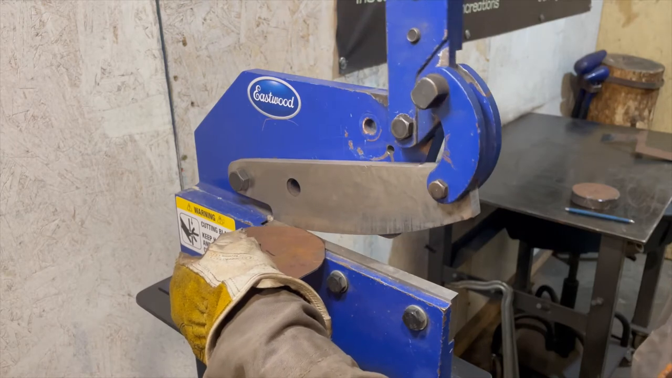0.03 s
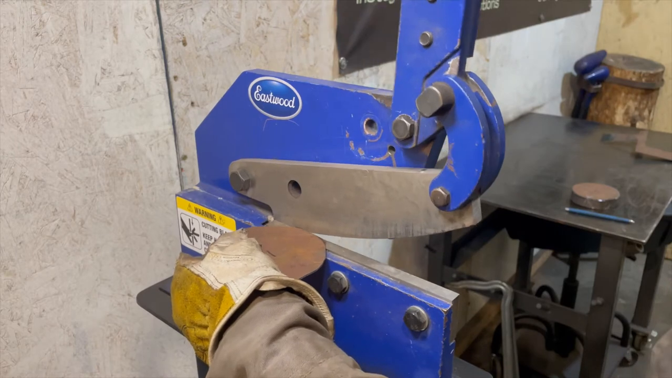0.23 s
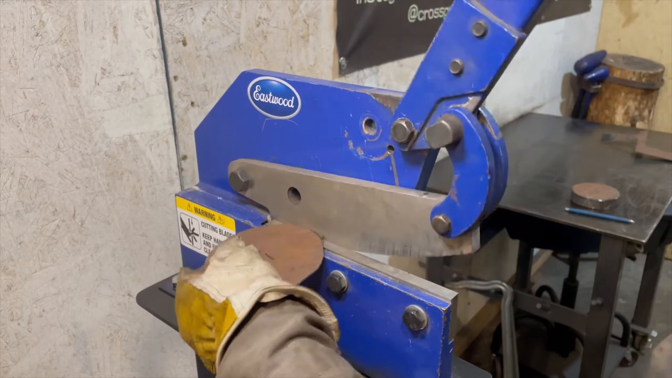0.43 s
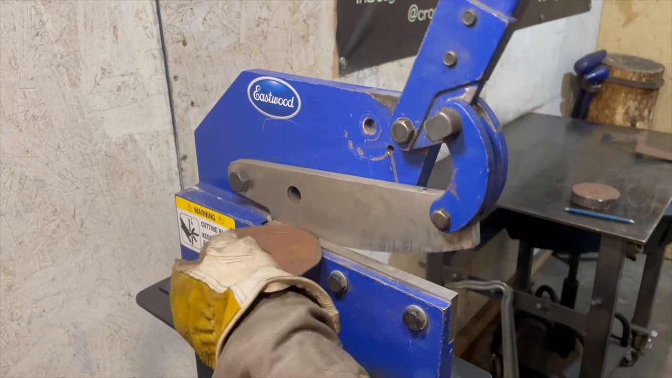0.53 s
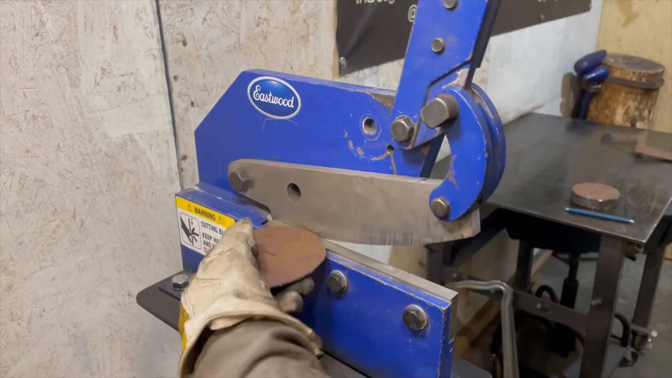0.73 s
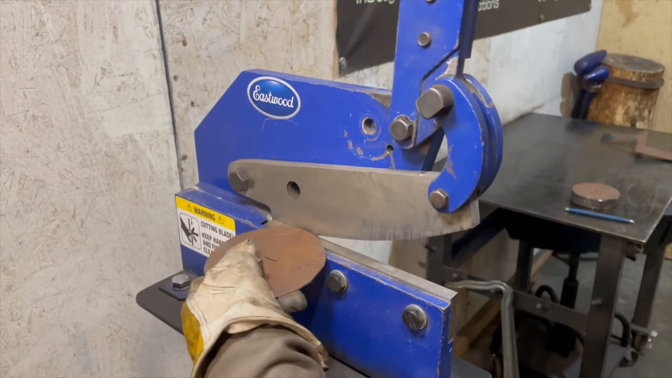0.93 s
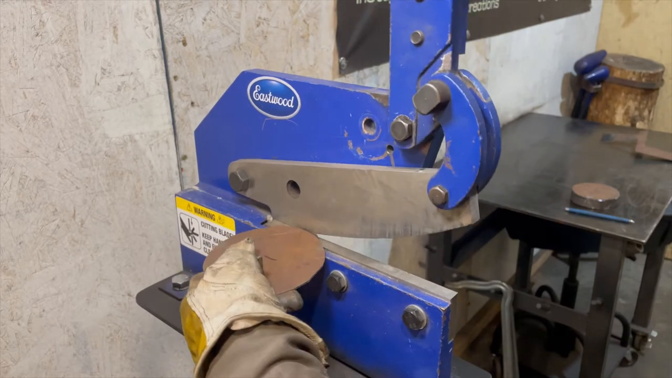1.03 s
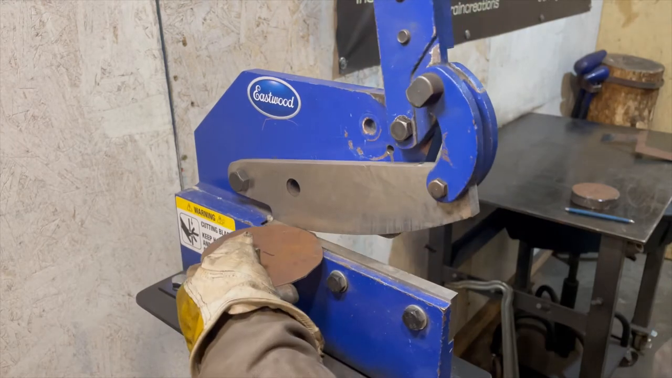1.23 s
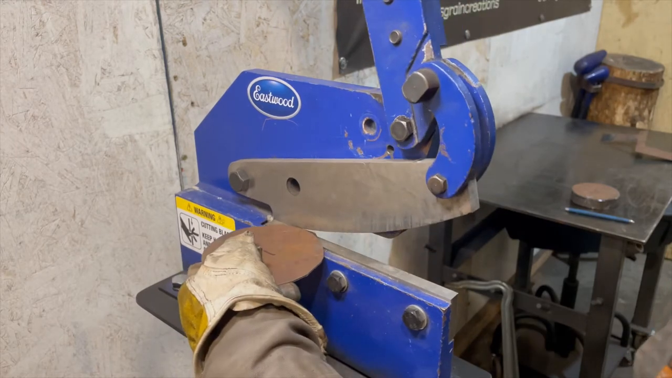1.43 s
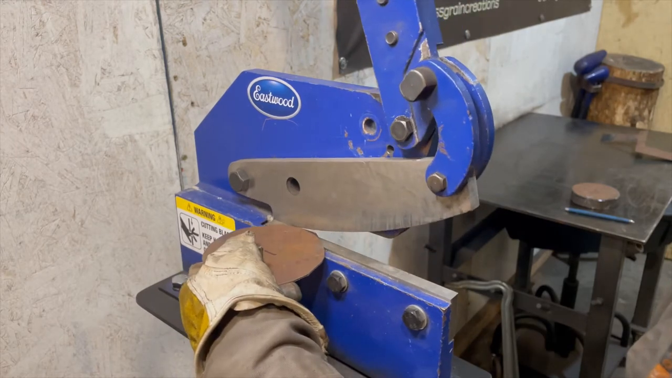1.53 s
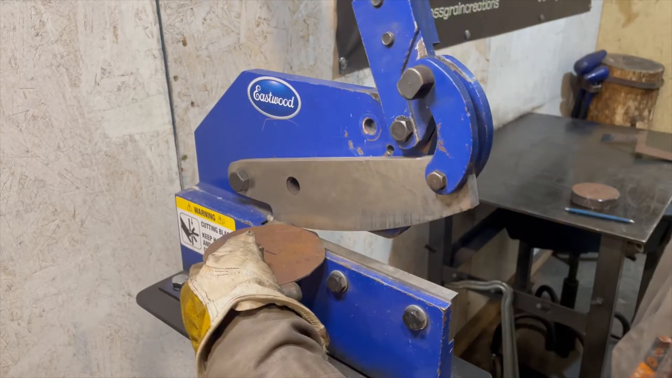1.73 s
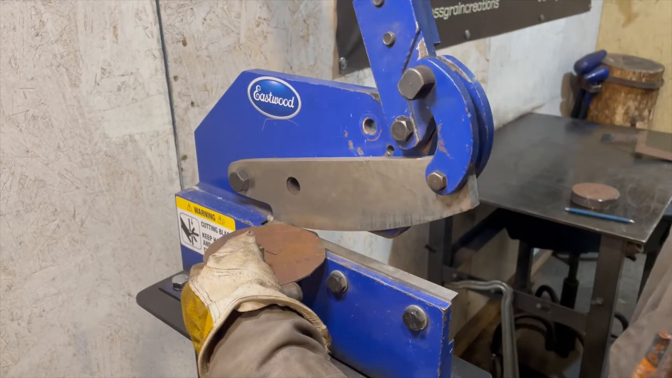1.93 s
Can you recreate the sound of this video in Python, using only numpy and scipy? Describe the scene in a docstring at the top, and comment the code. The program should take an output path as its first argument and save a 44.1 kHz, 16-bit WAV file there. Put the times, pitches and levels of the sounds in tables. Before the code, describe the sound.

A bench lever shear cuts a steel disc. A previous blow's faint ring and low bench hum fade first; a short bite at 0.2 s bursts into a loud, bright crack and clanging frame ring around 0.23-0.3 s. The offcut clinks and handle knocks at 0.52-0.6, 0.72 and 0.88 s. Ringing decays in the workshop, leaving quiet air, faint glove rustle from 1 s and tiny ticks after 1.27 s.

```python
"""A bench lever shear bites a steel disc and snaps through it, as fading sine rings and bursts of noise.
Frame and lever ring on, the offcut clinks as it drops and bounces, and the handle knocks its stop.
The bench hums and shakes in low wavering sines; a glove rustles and faint ticks follow.
An earlier blow is still dying at the start, over steady workshop air; the room answers the blows."""
import sys
import numpy as np
from scipy import signal
from scipy.fft import rfft, irfft, next_fast_len
from scipy.io import wavfile

SR = 44100
rng = np.random.default_rng(int(sys.argv[2]) if len(sys.argv) > 2 else 0)


def pcm_store(signal):
    """Save signal as 16-bit PCM."""
    levels = np.round(np.clip(np.atleast_2d(signal), -1, 1) * 32767)
    wavfile.write(sys.argv[1], SR, levels.astype(np.int16).T)


N = 88200
T = np.arange(N) / SR  # time of each sample, s

# In all tables t60 is the time to fade by 60 dB. Blow levels are before each layer's own level,
# and tilt brightens (+) or dulls (-) a blow around this pitch.
PIVOT_HZ = 1500
FLUTTER_HZ = 71.2  # how fast loose contacts make the rings waver
BAND_EDGES_HZ = np.geomspace(40, 17000, num=19)  # each band of a rattle fades by itself
EDGE_DB, EDGE_T60_S = 7, .014  # the sharp edge that starts each rattle

# What still rings of the earlier blow: [f/Hz, level/dB, t60/s]
EARLIER_MODES = [(360, -61.5, 1), (844, -51.5, 0.92), (1050, -60.5, .8), (1180, -64.5, .6)]
# The noise left from the earlier blow: [f/Hz, level/dB per Hz, t60/s]
EARLIER_RATTLE = [(60, -22.5, 1), (170, 9, .6), (406, -1.5, 0.34), (940, 3, .6), (1994, -12.5, 0.34),
                  (4740, -21, 0.23), (9000, -43, 0.36)]
EARLIER_DB = -48.5

# Level of the bench's low hum: [t/s, level/dB]
HUM_LEVEL = [(0.0, -42), (0.09, -65.5), (0.15, -61), (0.27, -44.5), (0.59, -56), (0.62, -51.5),
             (0.84, -56.5), (0.87, -58.5), (0.96, -62.5), (1.02, -69), (1.97, -85), (2.0, -68)]
HUM_HZ = 61.3
# Level of the bench's shaking: [t/s, level/dB]
SHAKE_LEVEL = [(0.0, -47), (0.23, -50), (0.26, -36), (0.4, -47), (0.54, -54.5), (0.61, -46), (0.89, -48.5),
               (0.92, -59), (0.96, -53), (2.0, -63)]
# Rates at which the bench sways: [f/Hz, level/dB]
SWAY = [(9.5, 0), (26, -4.5)]

# Level as the glove shifts the disc; first and last are held: [t/s, level/dB]
RUSTLE_LEVEL = [(1.0, -73), (1.1, -69), (1.3, -72.5), (1.45, -73), (1.57, -75), (1.62, -84)]
# Colour of that rustle: [f/Hz, level/dB per Hz]
RUSTLE_COLOUR = [(500, -59.5), (900, -7.5), (2300, 2), (3500, -6.5), (5000, -6.5), (6500, -14.5),
                 (10000, -59.5)]

# Colour of the workshop air: [f/Hz, level/dB per Hz]
AIR_COLOUR = [(18, -32), (30, -1.5), (90, -9), (194, -12), (336, -10.5), (437, -21.5), (526, -13.5),
              (649, -22.5), (1390, -25.5), (2410, -31.5), (3670, -31), (13300, -50.5), (16000, -63.5)]
AIR_DB = -68
# Faint steady tones: [f/Hz, level/dB]
STEADY_TONES = [(43, -69), (77, -70.5), (119, -73), (531, -74.5), (765, -80)]

# Level of the blade biting in: [t/s, level/dB]
BITE_LEVEL = [(.157, -89), (.162, -53), (.196, -56), (.2, -48), (.226, -43), (.232, -87)]
# Colour of the bite: [f/Hz, level/dB per Hz]
BITE_COLOUR = [(120, -47), (200, 2), (358, -1.5), (579, -1.5), (675, -19.5), (1070, -5), (1540, -12.5),
               (3620, -17), (12000, -58), (15600, -85), (22000, -120)]

# First sharp cracks of the steel: [t/s, level/dB, tilt/dB per octave]
CRACK_BLOWS = [(.2268, -10, -3), (.2322, -17, 2), (.238, -16, -1)]
# Rings of the disc: [f/Hz, level/dB, t60/s]
DISC_MODES = [(1268, -3, 0.084), (1529, -1.5, 0.041), (2850, -8.5, 0.013), (4750, -4, .05),
              (6780, -6.5, .05)]
# Rattle under the cracks: [f/Hz, level/dB per Hz, t60/s]
CRACK_RATTLE = [(300, -24.5, 0.079), (1190, 8.5, 0.015), (3500, -5, .04), (7260, -2, 0.054),
                (9000, -15.5, .03), (15000, -18.5, 0.04)]

# Blows that reach the lever: [t/s, level/dB]
LEVER_BLOWS = [(0.239, -31), (0.528, -38), (0.582, -30), (.65, -34), (.726, -41), (.88, -46)]
LEVER_HZ, LEVER_T60_S = 1247, 1.11

# Blows on the frame as the steel gives way: [t/s, level/dB, tilt/dB per octave]
SNAP_BLOWS = [(.2435, -9.5, 0.5), (.2485, -15, 1), (.255, -14.5, -2.5), (.264, -17, 2.5), (.275, -20, -5),
              (.296, -25, 0.5)]
# Rings of frame and blade: [f/Hz, level/dB, t60/s]
FRAME_MODES = [(323.7, -9, 0.53), (375.6, -4.5, 0.25), (592.6, -11.5, 0.29), (808, -5.5, 0.45),
               (867, -1.5, 0.44), (1044, -4.5, 0.53), (1100, -3.5, 1), (1124, -8.5, 0.29),
               (1680, -14.5, 0.1), (1860, -17, .4), (2057, -5.5, 0.46), (2632, -22, .4), (3004, -14, 0.12),
               (3231, -9.5, 0.37), (3285, 0.5, .33), (3303, -9.5, .3), (3773, -1.5, 0.32),
               (4441, -32.5, 0.78), (5830, -23, .4)]
# Rattle under the snaps: [f/Hz, level/dB per Hz, t60/s]
SNAP_RATTLE = [(80, -17.5, 0.26), (300, -7, 0.32), (1150, 2, 0.072), (3500, 1, .2), (7000, -9.5, .15),
               (9000, -19.5, .1), (15300, -33.5, 0.13)]

# Single notes under some blows: [t/s, f/Hz, level/dB, t60/s]
NOTES = [(.245, 136, -33, .5), (.525, 3768, -35, .1), (.531, 2390, -35, .08), (.583, 320, -22, .17),
         (.584, 136, -43, .4), (.712, 1087, -33, .25), (.725, 1087, -28, .24), (.73, 1015, -39, .3),
         (.9, 845, -43, .5)]

# The offcut landing and bouncing: [t/s, level/dB, tilt/dB per octave]
CLINK_BLOWS = [(.5245, -25, -6), (.531, -28.5, -6), (.7105, -31, -2), (.7245, -20, 0), (.739, -36.5, 1),
               (.845, -35, -0.5)]
# Rings of the offcut: [f/Hz, level/dB, t60/s]
OFFCUT_MODES = [(1510, -30, 0.11), (2485, -3.5, 0.26), (4333, -0.5, 0.19), (4430, -5, 0.098),
                (4675, -2.5, .17), (4730, -15.5, .25), (7720, -26, 0.33), (9500, -27, .2),
                (12800, -27, .15), (5740, -18, 0.54), (6450, -3, 0.41), (7200, -15, 0.32),
                (8979, -31, 0.35), (10200, -23.5, 0.16), (10560, -21.5, 0.24), (11570, -30, .2),
                (12000, -19.5, .15), (13500, -26.5, .15), (14800, -32.5, 0.17)]
# Rattle under the clinks: [f/Hz, level/dB per Hz, t60/s]
CLINK_RATTLE = [(300, -33.5, 0.06), (1200, -1, .08), (3000, 0.5, 0.021), (6500, 1.5, 0.028),
                (9000, -20.5, 0.12), (15000, -24.5, 0.081)]
REST_S, REST_T60_S = .88, .15  # the offcut's sound is faded out from here, this fast

# Duller knocks of handle and blade: [t/s, level/dB, tilt/dB per octave]
KNOCK_BLOWS = [(.5245, -31.5, 8.5), (.582, -20, 3), (.589, -23, -2), (.600, -22, 0), (.877, -30.5, -0.5),
               (.896, -40, 2.5), (.985, -36.5, -0.5), (1.014, -65, -4)]
# Rings of the stop and its casting: [f/Hz, level/dB, t60/s]
STOP_MODES = [(193.2, -13, 0.32), (713, -9.5, .2), (801.6, 2.5, 0.19), (1180, -2, 0.46), (1297, -5.5, .2),
              (1938, -20, 0.5), (2292, -8.5, .3), (2440, -20, .3), (3235, -13.5, 0.22), (3480, -14, 0.22)]
# Rattle under the knocks: [f/Hz, level/dB per Hz, t60/s]
KNOCK_RATTLE = [(80, -3.5, 0.13), (304, 7, 0.072), (1200, 9.5, 0.096), (3240, 3, 0.05),
                (5750, -14.5, 0.044), (15000, -55.5, .1)]

# Faint ticks afterwards: [t/s, level/dB, low f/Hz, high f/Hz, high note over low/dB]
TICKS = [(1.268, -52, 2100, 3400, -8), (1.593, -57, 1100, 1700, -2), (1.799, -54, 1300, 1800, -3),
         (1.871, -56, 1200, 1900, -3), (1.904, -60, 1200, 1800, -4)]
# Colour of each tick's puff: [f/Hz, level/dB per Hz, t60/s]
TICK_RATTLE = [(450, -25, .02), (800, -2, .02), (2000, 0, .02), (2900, -10, .015), (3800, -5, .015),
               (6000, -18, .01), (15000, -55, .01)]
TICK_T60_S, TICK_PUFF_DB = .02, -5  # fade of the two notes; puff compared with the tick's level

# How long the room rings: [f/Hz, t60/s]
SHOP_FADE = [(100, .9), (500, 1.5), (1000, 1.634), (2500, 0.87), (4500, 0.9), (8000, .7), (15000, 1)]
SHOP_DB, SHOP_DELAY_S = -9.5, .008
RING_SEND_DB = -9  # rings reach the room weaker than rattles

CEILING, KNEE = .41, 6  # the soft limit on peaks, and how suddenly it acts
ROLL_HZ, ROLL_DB = 14500, -8.5  # the microphone fades from here, by this much at the band limit
TOP_HZ = 16600  # band limit


def amp(db):
    """Turn decibels into a plain factor."""
    return 10 ** (np.asarray(db) / 20)


def unit(x):
    """Scale a signal to an rms of 1."""
    return x / np.sqrt(np.mean(x ** 2) + 1e-20)


def along(points, hz, column=1):
    """Read a table column at any frequency, on a log axis."""
    p = np.transpose(points)
    return np.interp(np.log(hz + 1), np.log(p[0] + 1), p[column])


def level(rows):
    """Draw a loudness curve through (t/s, level/dB) rows, holding the end values."""
    return amp(np.interp(T, *np.transpose(rows)))


def noise(gain):
    """Shape random noise by frequency, then set its rms to 1."""
    hz = np.fft.rfftfreq(N, 1 / SR)
    return unit(irfft(rfft(rng.standard_normal(N)) * gain(hz), N))


def coloured_noise(colour):
    """Make steady noise with the colour of a table."""
    return noise(lambda hz: amp(along(colour, hz)))


def ring(blows, modes, attack_s, rough):
    """Metal rings as fading, wavering sines; every blow adds energy to each of them."""
    hz, db, t60 = np.transpose(modes)[..., None]
    start = round(blows[0][0] * SR)
    stop = round(SR * (blows[-1][0] + min(t60.max(), 1.2)))
    t = T[start:stop]
    # straight lines between random points make the waver
    knots = rng.standard_normal((2, len(hz), 400))
    place = np.minimum((t - t[0]) * FLUTTER_HZ, 398)
    k = place.astype(int)
    part = place - k
    size, phase = rough * (knots[..., k] * (1 - part) + knots[..., k + 1] * part)
    power = np.zeros(size.shape)
    for s, blow_db, tilt_db in blows:
        age = np.maximum(t - s, 0)
        tilt = tilt_db * np.log2(hz / PIVOT_HZ)
        gain_db = blow_db + db + tilt + rng.normal(0, 1.5, hz.shape)  # no two blows quite alike
        rise = (1 - np.exp(-age / attack_s)) ** 2
        power += (amp(gain_db - 60 * age / np.maximum(t60, .005)) * rise) ** 2
    waves = np.sin(2 * np.pi * hz * (t - t[0]) + 2 * phase)
    y = (np.sqrt(power) * (1 + size) * waves).sum(0)
    return np.pad(y, (start, N))[:N]


def rattle(blows, colour, attack_s):
    """Each blow sets off noise: a sharp edge, then every band dying at its own speed."""
    hz = np.fft.rfftfreq(N, 1 / SR)
    spectrum = rfft(rng.standard_normal(N)) * amp(along(colour, hz))
    spectrum = spectrum / np.sqrt(np.mean(irfft(spectrum, N) ** 2))
    s, db, tilt_db = np.transpose(blows)
    edge_fall = amp(-120 / SR / EDGE_T60_S)  # -120 because power fades, not amplitude
    rise = np.exp(-1 / SR / attack_s)
    out = np.zeros(N)
    for lo, hi in zip(BAND_EDGES_HZ, BAND_EDGES_HZ[1:]):
        mid = np.sqrt(lo * hi)
        kicks = np.zeros(N)
        kicks[np.round(s * SR).astype(int)] = amp(db + tilt_db * np.log2(mid / PIVOT_HZ)) ** 2
        fall = amp(-120 / SR / max(along(colour, mid, column=2), .003))
        body = signal.lfilter([1], [1, -fall], kicks)
        edge = amp(EDGE_DB) ** 2 * signal.lfilter([1], [1, -edge_fall], kicks)
        size = np.sqrt(body + edge)
        for _ in range(2):  # round off the start twice
            size = signal.lfilter([1 - rise], [1, -rise], size)
        out += irfft(spectrum * ((hz >= lo) & (hz < hi)), N) * size
    return out


def strike(blows, modes, colour, ring_db, rattle_db, attack_s, rough):
    """A blow on metal makes it ring (row 0) and rattle (row 1)."""
    rings = amp(ring_db) * ring(blows, modes, attack_s, rough)
    rattles = amp(rattle_db) * rattle(blows, colour, attack_s / 2)
    return np.array([rings, rattles])


def earlier_blow():
    """The blow before is still dying: fading rings and noise from the very start."""
    rings = ring([(0, 0, 0)], EARLIER_MODES, attack_s=0.00067, rough=.25)
    return rings + rattle([(0.0024, EARLIER_DB, 0.0045)], EARLIER_RATTLE, attack_s=.001)


def slow_wander():
    """Random drift slower than 6 Hz, which keeps a sine a little unsteady."""
    return noise(lambda hz: hz < 6)


def bench():
    """The bench hums low and sways, as slightly unsteady sines."""
    hum = np.sqrt(2) * np.sin(2 * np.pi * HUM_HZ * T + 0.45 * slow_wander())
    sway = unit(sum(amp(db) * np.sin(2 * np.pi * hz * T + .5 * slow_wander()) for hz, db in SWAY))
    return level(HUM_LEVEL) * hum + level(SHAKE_LEVEL) * sway


def glove_rustle():
    """The glove shifts the disc: faint coloured noise that rises and falls."""
    return level(RUSTLE_LEVEL) * coloured_noise(RUSTLE_COLOUR)


def air():
    """Workshop air as steady noise with faint steady tones."""
    tones = sum(amp(db) * np.sin(2 * np.pi * (hz * T + rng.random())) for hz, db in STEADY_TONES)
    return amp(AIR_DB) * coloured_noise([(20, -72.5)] + AIR_COLOUR) + tones


def bite():
    """The blade bites in: coloured noise following its own loudness curve."""
    return level(BITE_LEVEL) * coloured_noise([(150, -120)] + BITE_COLOUR + [(16000, -120)])


def cracks():
    """The steel first cracks: the disc rings shortly, with a very sharp start."""
    return strike(CRACK_BLOWS, DISC_MODES, CRACK_RATTLE,
                  ring_db=-6, rattle_db=-6.5, attack_s=.0002, rough=0.068)


def lever():
    """The lever gives one long clean ring, fed with energy by several blows."""
    power = 0
    for s, db in LEVER_BLOWS:
        rise = np.clip((T - s) / 0.0042, 0, 1)
        power = power + amp(db - 60 * (T - s) / LEVER_T60_S) ** 2 * rise
    wander = .3 * noise(lambda hz: hz < 25)
    return np.sqrt(power) * np.sin(2 * np.pi * LEVER_HZ * T + wander)


def snaps():
    """The steel gives way and strikes the frame, which rings roughly and rattles."""
    return strike(SNAP_BLOWS, FRAME_MODES, SNAP_RATTLE,
                  ring_db=-13, rattle_db=-8, attack_s=0.00027, rough=0.54)


def single_notes():
    """Some blows carry one extra fading note."""
    return sum(ring([(s, 0, 0)], [note], attack_s=0.0033, rough=0.083) for s, *note in NOTES)


def offcut():
    """The offcut clinks as it lands and bounces, then its sound is faded as it rests."""
    clinks = strike(CLINK_BLOWS, OFFCUT_MODES, CLINK_RATTLE,
                    ring_db=-7, rattle_db=-6, attack_s=.0003, rough=.5)
    return clinks * amp(-60 * np.maximum(T - REST_S, 0) / REST_T60_S)


def knocks():
    """Handle and blade knock: the stop and its casting ring with a slower start."""
    return strike(KNOCK_BLOWS, STOP_MODES, KNOCK_RATTLE,
                  ring_db=-9.5, rattle_db=-5.5, attack_s=.0005, rough=0.47)


def ticks():
    """Each faint tick is two short notes and a puff of noise."""
    notes = 0
    for s, db, low_hz, high_hz, over_db in TICKS:
        pair = [(low_hz, 0, TICK_T60_S), (high_hz, over_db, TICK_T60_S)]
        notes = notes + ring([(s, db, 0)], pair, attack_s=0.00093, rough=0.44)
    puffs = [(s, db + TICK_PUFF_DB, 0) for s, db, *_ in TICKS]
    return notes + rattle(puffs, TICK_RATTLE, attack_s=0.0009)


def shop(x):
    """The room answers with a noise tail, each frequency dying at its own speed."""
    hz, t, z = signal.stft(rng.standard_normal(SR + SR // 2), SR, nperseg=256)
    fade = amp(-60 * t / along(SHOP_FADE, hz)[:, None])
    tail = signal.istft(z * fade, SR, nperseg=256)[1]
    delayed = np.pad(x, (round(SHOP_DELAY_S * SR), 0))
    return signal.fftconvolve(delayed, tail / np.linalg.norm(tail))[:N]


def scene():
    """Add up all sources; the shear's blows, bite and notes also go through the room."""
    background = earlier_blow() + bench() + glove_rustle() + air()
    rings, rattles = cracks() + snaps() + offcut() + knocks()
    rings = rings + single_notes()
    rattles = rattles + bite()
    room = amp(SHOP_DB) * shop(rattles + amp(RING_SEND_DB) * rings)
    return (background + rings + rattles + room + lever() + ticks())[None]


def record(dry):
    """Put a soft ceiling on the peaks, fade the treble, then cut at the band limit."""
    x = dry / (1 + np.abs(dry / CEILING) ** KNEE) ** (1 / KNEE)
    m = next_fast_len(N + SR // 4)
    hz = np.fft.rfftfreq(m, 1 / SR)
    treble = amp(np.interp(hz, [ROLL_HZ, TOP_HZ], [0, ROLL_DB])) * (hz < TOP_HZ)
    return irfft(rfft(x, m) * treble, m)[..., :N]


dry = scene()
out = record(dry)
pcm_store(out)
```